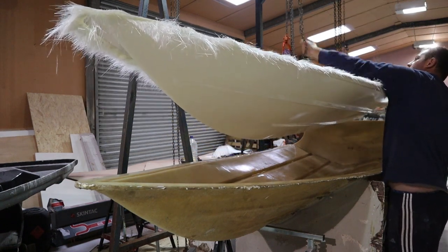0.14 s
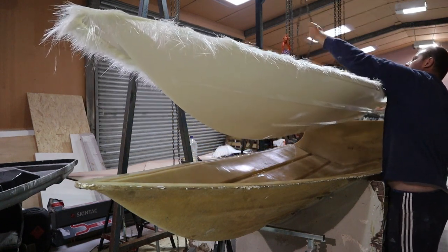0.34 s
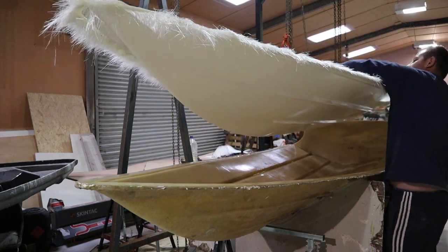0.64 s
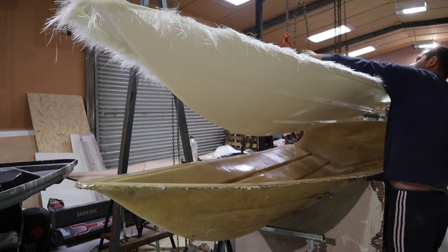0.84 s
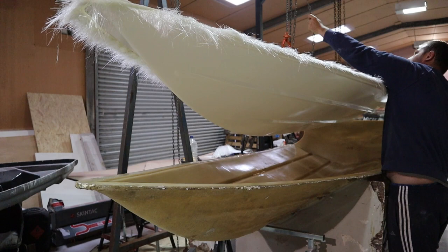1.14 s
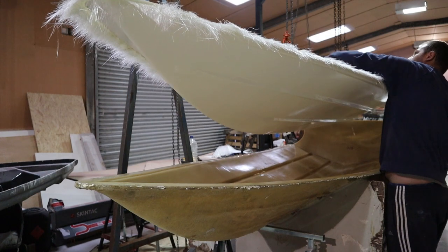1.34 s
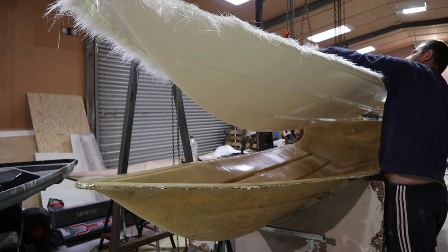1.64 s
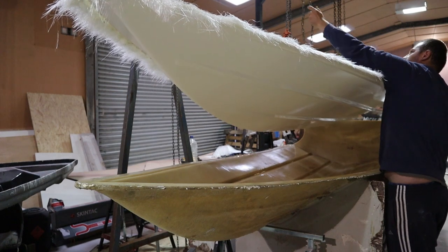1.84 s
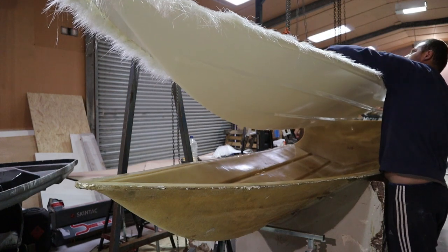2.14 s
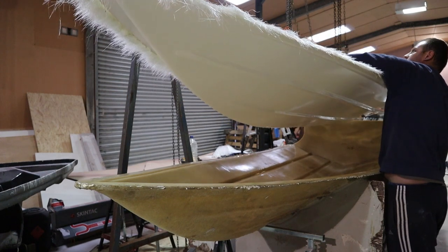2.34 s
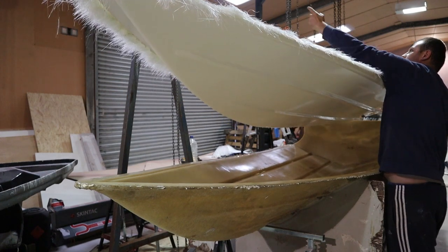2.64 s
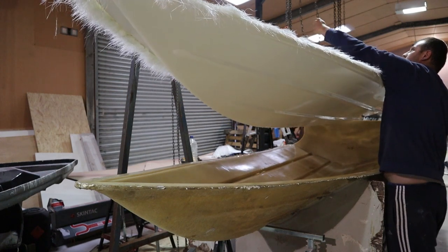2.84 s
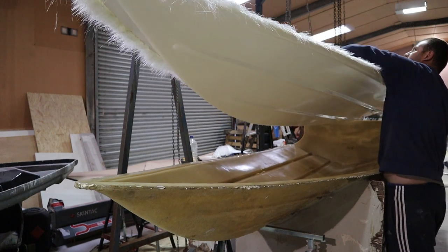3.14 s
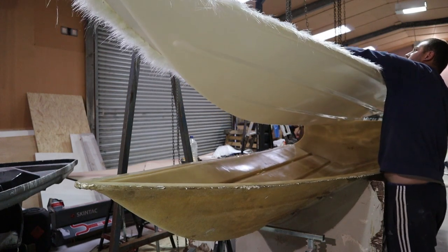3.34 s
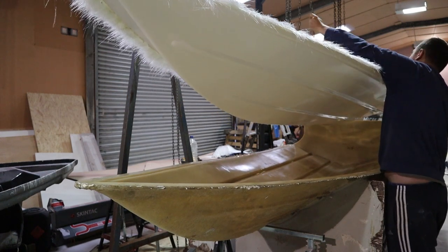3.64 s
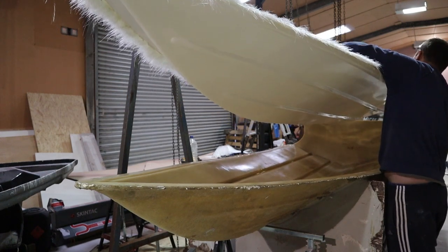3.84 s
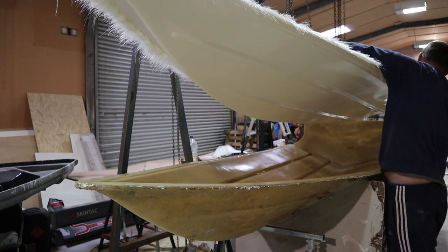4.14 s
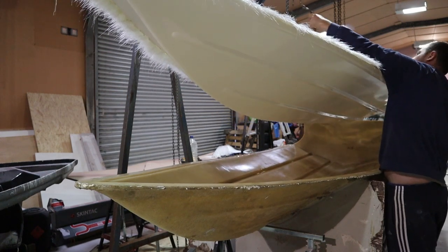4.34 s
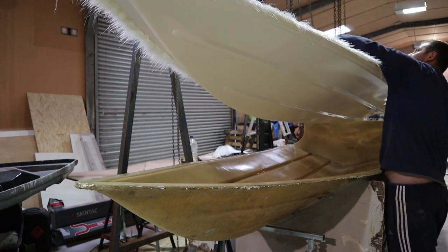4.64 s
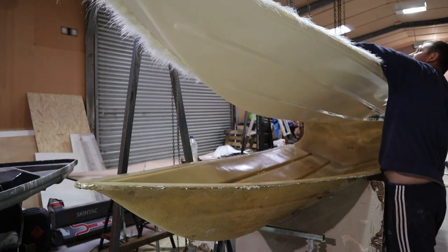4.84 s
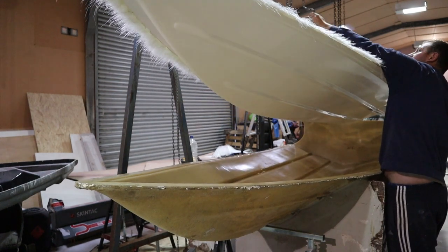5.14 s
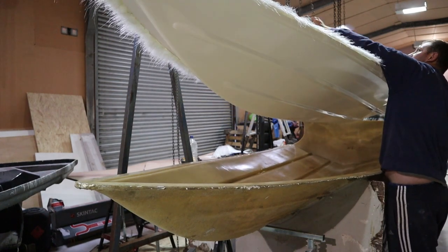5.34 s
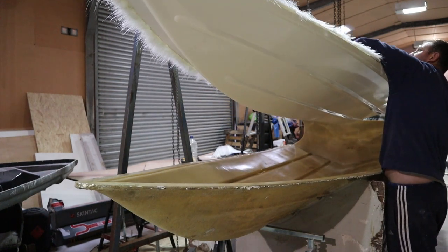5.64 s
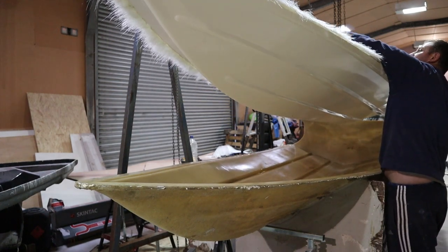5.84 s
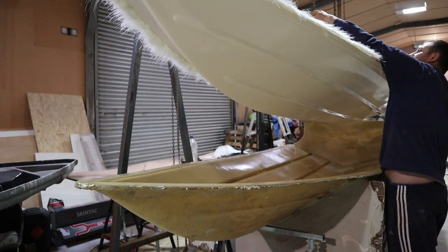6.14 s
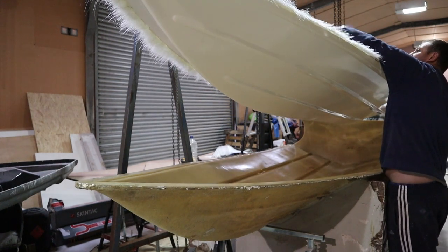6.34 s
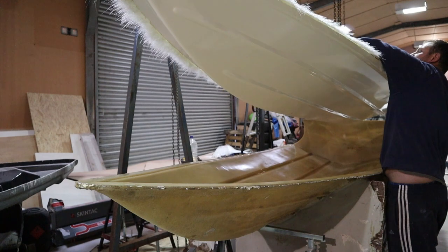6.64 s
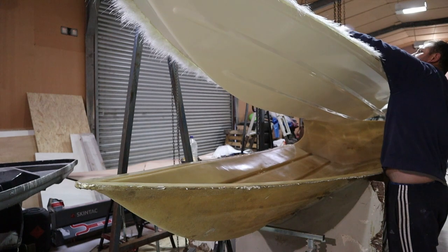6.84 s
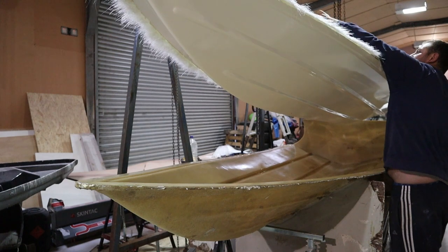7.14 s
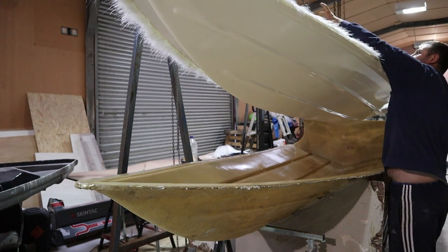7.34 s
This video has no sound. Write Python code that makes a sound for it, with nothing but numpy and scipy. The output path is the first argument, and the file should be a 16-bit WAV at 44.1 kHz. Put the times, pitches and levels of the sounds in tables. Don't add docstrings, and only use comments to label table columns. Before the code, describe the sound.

In a hard-walled workshop, a steel hand chain is hauled in short pulls, roughly every three quarters of a second. Each begins with small clinks and a bright jingle, then loud slaps and a rasp as links drag over a thin fibreglass rim. The slack chain taps and clinks afterwards. Close stereo microphones a few metres away catch about a second of ringing and faint hiss.

```python
import sys
import numpy as np
from scipy import signal
from scipy.fft import rfft, irfft, next_fast_len
from scipy.io import wavfile
from scipy.ndimage import uniform_filter1d

SR = 44100
rng = np.random.default_rng(int(sys.argv[2]) if len(sys.argv) > 2 else 0)


def dump(signal):
    limited = np.clip(np.atleast_2d(signal).T, -1, 1)
    pcm = np.round(limited * 32767).astype(np.int16)
    wavfile.write(sys.argv[1], SR, pcm)


def volts_from_db(level):
    exponent = np.asarray(level, float) / 20
    return 10 ** exponent


N = 330309
LEAD = next_fast_len(N + 30000) - N


def evened(x):
    return x / np.sqrt(np.mean(x ** 2) + 1e-20)


def read(points, hz):
    f, value = np.transpose(points)
    return np.interp(np.log(hz + 1), np.log(f + 1), value)


def add(mix, s, sound):
    part = mix[LEAD + round(s * SR):][:len(sound)]
    part += sound[:len(part)]


def effort(*strokes):
    t = (np.arange(LEAD + N) - LEAD) / SR
    db = np.max([np.interp(t, s, level, -200, -200) for s, level in strokes], axis=0)
    return uniform_filter1d(volts_from_db(db), 130)


def scatter(templates, per_s, spread_db):
    chance, size, pick = rng.random((LEAD + N, 3)).T
    out = np.zeros(LEAD + N)
    for i in np.flatnonzero(chance < per_s / SR):
        blow_db = spread_db * min(-np.log(size[i] + 1e-9), 4)
        template = templates[int(pick[i] * len(templates))]
        add(out, (i - LEAD) / SR, volts_from_db(blow_db) * template)
    return evened(out)


# pitch in Hz, level in dB.
SHELL = [(50, -31), (150, -7.5), (500, -11), (1000, -3.5), (2000, 2), (3000, 3), (4500, 2), (7000, -4.5),
         (11000, -46), (15000, -48)]


def slap(ring_hz, sharp, peak_db, luck):
    hz = np.fft.rfftfreq(1024, 1 / SR)[1:]
    ring = 1 + volts_from_db(peak_db) / (1 + 2j * sharp * (hz / ring_hz - ring_hz / hz))
    lag = 0.1295 * (2 * np.sqrt(hz) - hz / np.sqrt(ring_hz)) + hz * (256 / SR - sharp / ring_hz / 4)
    spectrum = volts_from_db(read(SHELL, hz)) * ring * np.exp(-2j * np.pi * (lag + luck))
    wave = irfft(np.r_[0, spectrum]) * np.hanning(1024) ** 0.19
    return wave / abs(wave).max()


# full contact in seconds, closing-in time
# in seconds, length in seconds, rasp level in dB, ring in Hz.
HAULED = [(-.2, .01, .23, -18.5, 2590), (0.555, 0.0099, 0.12, -28.5, 2300),
          (0.726, 0.056, .125, -22.5, 2470), (1.294, 0.016, 0.054, -33.5, 1700),
          (1.374, 0.036, 0.0517, -19.5, 2510), (1.454, 0.04, 0.047, -16, 2550),
          (1.57, 0.022, 0.049, -23.5, 2480), (2.187, 0.1, 0.084, -21, 2670),
          (2.268, 0.095, 0.061, -16.5, 2670), (2.388, 0.027, .042, -20, 2700),
          (3.164, 0.091, 0.096, -19, 2800), (3.31, 0.12, 0.034, -16.5, 2830),
          (3.955, 0.08, 0.076, -16, 3000), (4.076, 0.078, 0.051, -20.5, 2950),
          (4.699, .04, 0.12, -26.5, 3960), (4.808, 0.15, 0.1314, -18, 2780), (4.98, 0.035, 0.13, -29, 3040),
          (5.621, 0.14, 0.046, -20, 2400), (5.671, .04, .055, -18.5, 3310),
          (5.757, 0.035, 0.035, -18.5, 2970), (6.498, .004, 0.03, -17, 3530),
          (6.57, 0.061, 0.067, -21, 3160), (6.684, 0.13, 0.047, -17, 3320),
          (7.433, 0.0076, .1, -20.5, 3500)]
SWUNG = [
    (0.039, .01, 0.127, -26, 2370),
    (4.33, .02, 0.0513, -38.5, 1195),
    (.984, .004, .015, -33, 2450),
    (1.003, 0.018, 0.021, -23.5, 2870),
    (1.99, 0.034, .06, -47.5, 1340),
    (2.681, 0.047, 0.042, -37.5, 1840),
    (4.24, 0.024, 0.087, -30.5, 3520),
    (5.904, .02, .04, -23, 2210),
    (5.975, 0.058, 0.033, -21, 2160),
    (7.378, 0.0099, .04, -29, 2400),
]
CLOSE_IN_DB = -14.5


def dragging():
    strokes = []
    for s, near, d, db, _ in HAULED + SWUNG:
        eased_db = db - 2.5 * d
        lifted_s = s + d + 40 / 196
        strokes.append(([s - near, s, s + d, lifted_s], [db + CLOSE_IN_DB, db, eased_db, eased_db - 55]))
    return effort(*strokes)


# time in seconds, peak in dB, ring in Hz.
SLAPS = [(.0083, -9, 2680), (.7296, -9, 2030), (.9855, -9, 2450), (1.3873, -4, 2790), (1.4658, -5, 2990),
         (1.4896, -5, 2490), (1.5033, -5, 2550), (1.5833, -9, 2530), (2.1816, -7, 2590), (2.2764, -4, 2480),
         (2.2837, -5, 2370), (2.3901, -6, 2390), (2.4089, -5, 2500), (3.1618, -5, 2320), (3.1756, -5, 2250),
         (3.9567, -5, 2660), (3.9853, -5, 2530), (4.0935, -9, 3200), (4.8213, -4, 2090), (4.8339, -7, 3460),
         (4.8798, -7, 2110), (5.6212, -6, 2090), (5.6599, -6, 2220), (5.6976, -7, 2700), (5.7594, -4, 3370),
         (6.4999, -5, 3600), (6.5226, -2, 3800), (6.5774, -8, 3490), (6.7072, -6, 3710), (7.4597, -6, 3330)]
# time in seconds, peak in dB, ring in Hz.
TAPS = [(.1499, -15, 2200), (.5584, -20, 2030), (.6054, -16, 2950), (.8098, -10, 2600), (1.0112, -12, 2310),
        (1.0839, -20, 2520), (1.1508, -27, 1320), (1.226, -28, 1930), (1.2986, -20, 1800),
        (2.0122, -28, 2340), (6.4105, -26, 5820), (2.6887, -27, 1850), (5.2773, -34, 6300),
        (4.6086, -25, 5800), (3.5026, -20, 3280), (4.2391, -17, 4430), (4.2681, -14, 3910),
        (4.2853, -12, 3890), (4.704, -15, 3560), (5.0455, -17, 3350), (2.1398, -21, 2580),
        (5.3495, -33, 1840), (5.9145, -13, 2060), (5.9936, -12, 2110), (6.4744, -20, 5870),
        (7.2663, -38, 2190), (5.4327, -25, 6000), (7.3781, -20, 2310), (7.3945, -14, 2550),
        (7.4381, -10, 3050)]


def passing_links():
    gap_s, jitter, detune = 0.0125, 0.2, 0.213
    listed, rows = np.array(SLAPS + TAPS)[:, 0], []
    drags = HAULED + SWUNG
    for (s, near, d, db, hz), luck in zip(drags, rng.standard_normal((len(drags), 36, 3))):
        steps = np.cumsum(gap_s * np.exp(jitter * luck[:, 0]))
        at = s + steps - steps[4]
        touching = (at > s - near / 4) & (at < s + d)
        free = abs(at[:, None] - listed).min(axis=1) > gap_s / 2
        peak_db = db + CLOSE_IN_DB * np.maximum(s - at, 0) / near + 6.5 + 0.5 * luck[:, 1]
        links = np.array([at, peak_db, hz * np.exp(detune * luck[:, 2]), 10 * luck[:, 2]])
        rows += list(links.T[touching & free])
    return rows


def hull():
    hz = np.geomspace(500, 6500, 32)
    small = [evened(slap(f, 1.556, 13.6, rng.random())) * volts_from_db(read(SHELL, f) / 2) for f in hz]
    out, shake = np.zeros((2, LEAD + N))
    listed = [row + (luck,) for row, luck in zip(SLAPS + TAPS, rng.random(len(SLAPS + TAPS)))]
    for s, db, ring_hz, luck in listed + passing_links():
        ring_db = 8 - .2 * db
        add(out, s - 256 / SR, volts_from_db(db + 2.5) * slap(ring_hz, 1.93, ring_db, luck))
        add(shake, s, volts_from_db(db - 60 * np.arange(4000) / SR / 0.04))
    clumps = 0.71 + 0.4 * shake / (uniform_filter1d(shake, 5000) + 0.0011)

    s, _, _, _, ring_hz = np.transpose(sorted(HAULED + SWUNG))
    t = (np.arange(LEAD + N) - LEAD) / SR
    tilt = volts_from_db(6 * np.interp(t, s, np.log2(ring_hz / 2700)))
    dull = volts_from_db(-5.5) * scatter(small[:21], per_s=720, spread_db=1.0)
    bright = volts_from_db(-5) * scatter(small[21:], per_s=380, spread_db=1.0)
    rasp = dull / tilt + bright * tilt
    return np.array([out, dragging() * clumps * rasp])


# start in seconds, length in seconds, jingle at full speed in dB,
# jingle as the hand lets go in dB.
PULLS = [(-.25, 0.32, -27, -19), (0.522, 0.26, -22, -21.5), (1.283, 0.29, -20.5, -20.5),
         (2.086, .34, -21, -21), (3.036, .33, -21.5, -23.5), (3.813, .31, -20, -24),
         (4.658, 0.31, -20.5, -24.5), (5.468, 0.33, -25, -25.5), (5.95, 0.048, -24.5, -28),
         (6.412, 0.33, -23, -29.5), (7.43, 0.17, -27, -34)]


def hauling():
    strokes = []
    for s, d, full, end in PULLS:
        full_speed_s = s + min(0.057, d / 2)
        stopped_s = s + d + 40 / 240
        strokes.append(([s, full_speed_s, s + d, stopped_s], [full - 7.5, full, end, end - 40]))
    return effort(*strokes)


# pitch in Hz, level in dB.
STEEL = [(3470, 7), (3720, 8.5), (4470, 7.5), (5520, 5), (6200, 4.5), (7250, 7.5), (7650, 3.5), (8040, 5),
         (8510, 6), (9250, 7), (9800, -7.5), (10150, 7.5), (10500, -8.5), (11040, 6.5), (11400, 4.5),
         (12100, -59), (12600, 4.5), (13100, 1), (13700, 0), (14400, -34)]


def clink(luck, tick_db, t60):
    t = np.arange(1400) / SR
    tick = volts_from_db(tick_db - 60 * t / .015) * np.diff(rng.standard_normal(len(t) + 1))
    hz, db = np.transpose(STEEL * 3)
    louder, sharper, phase = luck.T
    waves = np.sin(2 * np.pi * np.outer(hz * (1 + .02 * sharper), t) + 3 * phase[:, None])
    ring = volts_from_db(db + 4.0 * louder) @ waves
    wave = tick + volts_from_db(-60 * t / t60) * ring
    return wave / abs(wave).max()


# time in seconds, peak in dB.
SEATS = [(.5101, -34), (.5287, -25), (.5457, -25), (.5822, -22), (1.2717, -36), (1.2841, -28),
         (1.3015, -21), (1.3285, -19), (1.3381, -19), (2.0737, -41), (2.0818, -28), (2.1027, -26),
         (2.1726, -18), (3.0381, -31), (3.0585, -25), (3.0984, -18), (3.1357, -18), (3.8146, -28),
         (3.8334, -23), (3.9232, -18), (4.6542, -23), (4.6727, -23), (4.6902, -22), (5.4746, -29),
         (5.5167, -25), (5.5701, -19), (6.4093, -35), (6.4227, -24), (6.443, -26), (7.3892, -44)]
# time in seconds, peak in dB.
SWINGS = [(.4213, -48), (.4725, -42), (.9966, -36), (1.0055, -33), (1.019, -30), (1.2444, -36),
          (1.8387, -38), (1.887, -38), (2.8171, -45), (2.8561, -50), (2.9204, -44), (2.9344, -52),
          (2.9839, -55), (3.607, -43), (3.7409, -42), (3.7512, -36), (4.238, -27), (4.2672, -28),
          (4.284, -25), (4.3243, -36), (4.6069, -36), (5.2773, -42), (5.3666, -49), (5.4232, -39),
          (5.4324, -30), (5.914, -29), (5.9654, -30), (5.9914, -26), (7.0865, -51), (7.1189, -51)]


def wheel():
    small = [clink(luck, tick_db=7, t60=.025) for luck in rng.standard_normal((48, 3 * len(STEEL), 3))]
    jingle = np.array([scatter(half, per_s=290, spread_db=3.0) for half in (small[::2], small[1::2])])
    out = volts_from_db(-6.0) * hauling() * jingle
    knocks = SEATS + SWINGS + [(s, db - 19.5) for s, db, _ in SLAPS]
    for (s, db), luck in zip(knocks, rng.standard_normal((len(knocks), 3 * len(STEEL), 3))):
        add(out[1], s, volts_from_db(db + 11) * clink(luck, tick_db=15, t60=0.018))
    return out


# time in seconds, level in dB.
JERKS = [(.8, -62), (1.049, -36), (1.57, -30.5), (2.06, -45), (2.47, -39), (2.7, -59), (3.1, -47),
         (3.36, -41), (4.36, -58), (4.682, -55), (5.75, -42), (6.76, -36)]
# pitch in Hz, width in Hz, level in dB.
BOOM = [(50, 11, -33), (112.2, 17.6, -1), (125, 12, -11.5), (203, 30, -6), (324, 117, -5), (428, 270, 4.5)]


def boom():
    keep = np.exp(-1 / (0.017 * SR))
    pressure = dragging() ** 0.69
    sway = volts_from_db(-21.5) * signal.lfilter([1 - keep], [1, -keep], pressure)
    sway += effort(*[([s - .02, s, s + 0.18], [db, db, db - 32]) for s, db in JERKS])
    jolts = sway * scatter([np.hanning(30)], per_s=270, spread_db=0.5)
    out = np.zeros(LEAD + N)
    for hz, width, db in BOOM:
        b, a = signal.iirpeak(hz, hz / width, SR)
        mode = signal.lfilter(b, a, signal.lfilter(b, a, jolts))
        out += volts_from_db(db) * mode / np.sqrt(width / 100)
    return out


# pitch in Hz, time to fade by 60 dB in seconds.
HALL = [(60, 0.6), (250, 1.01), (700, 1.34), (2000, 1), (5000, 0.85), (9000, 0.63), (14000, 0.74)]


def hall(x):
    taps = np.zeros((2, 2 * SR))
    at = np.arange(250, 2 * SR - 16, 16) + rng.integers(0, 16, (2, (2 * SR - 251) // 16))
    np.put_along_axis(taps, at, rng.choice([-1., 1.], at.shape), 1)
    hz, t, z = signal.stft(taps, SR, nperseg=512)
    early = 1 + .4 * np.exp(-t / .04)
    fade = volts_from_db(-60 * t / read(HALL, hz)[:, None])
    tail = signal.istft(z * early * fade, SR, nperseg=512)[1]
    return signal.fftconvolve(x[None], tail / np.linalg.norm(tail[0]), axes=1)[:, :LEAD + N]


# pitch in Hz, level in dB per Hz.
AIR = [(24, -43), (40, -7.5), (233, -8.5), (346, -6.5), (1230, -9), (1390, -3.5), (2110, -2),
       (15000, -22.5)]


def air():
    colour = volts_from_db(read(AIR, np.fft.rfftfreq(LEAD + N, 1 / SR)))
    z = rfft(rng.standard_normal((2, LEAD + N))) * colour
    return volts_from_db(-48) * evened(irfft(z, LEAD + N))


# pitch in Hz, likeness from 0 to 1.
HALL_SAME = [(60, 1), (250, .97), (500, .85), (1000, .55), (2000, .1), (4000, 0), (12000, 0)]
# pitch in Hz, lead in radians.
LEFT_LEADS = [(60, 0), (950, -.15), (2000, -1.1), (3000, -2), (6000, -1.7), (12000, -2)]
# pitch in Hz, difference in dB.
LEFT_LOUDER = [(60, 0), (400, -.2), (1300, -1.8), (2400, -3.4), (4400, -.7), (15000, .5)]
# pitch in Hz, level in dB.
MIC = [(11500, 0), (12300, -5), (14000, -9), (15700, -22)]


def ports(shell, steel, diffuse):
    hz = np.fft.rfftfreq(LEAD + N, 1 / SR)
    same, (a, b) = np.clip(read(HALL_SAME, hz), 0, 1), rfft(diffuse)
    both, apart = np.sqrt((1 + same) / 2) * a, np.sqrt((1 - same) / 2) * b
    side = np.array([[1], [-1]])
    turn = np.exp(.5j * side * read(LEFT_LEADS, hz))
    overhead, knocking = rfft(steel)
    slaps, rasp = rfft(shell)
    z = slaps * turn ** .4 + rasp * turn ** 1.2
    z = z + overhead * turn ** 1.5 + knocking * turn ** .4
    z = z + (both + side * apart) * turn
    return irfft(z * volts_from_db(side * read(LEFT_LOUDER, hz) / 2 + read(MIC, hz)), LEAD + N)


def scene():
    shell, steel, low = hull(), wheel(), boom()
    wet = hall(volts_from_db(-2.5) * shell.sum(0) + volts_from_db(-2.5) * steel.sum(0) + volts_from_db(-2.0) * low)
    return ports(shell + low / 2, steel, wet + air())[:, LEAD:]


def low_pass(x):
    return signal.sosfilt(signal.butter(12, 15680, fs=SR, output="sos"), x)


def record(dry):
    return low_pass(np.clip(dry, -1, 1))


dry = scene()
out = record(dry)
dump(out)
```